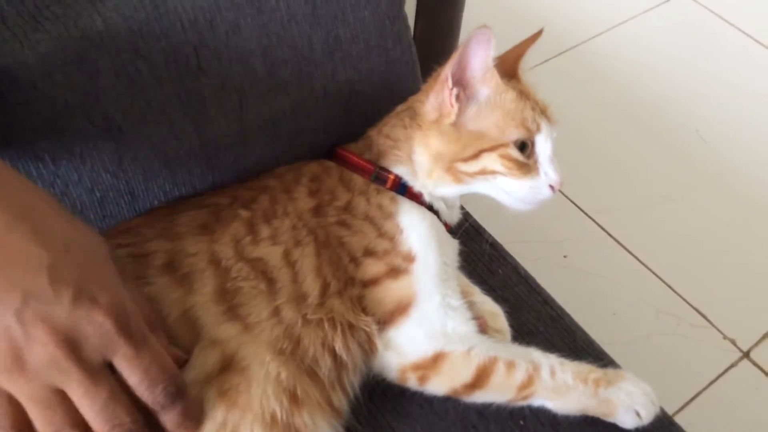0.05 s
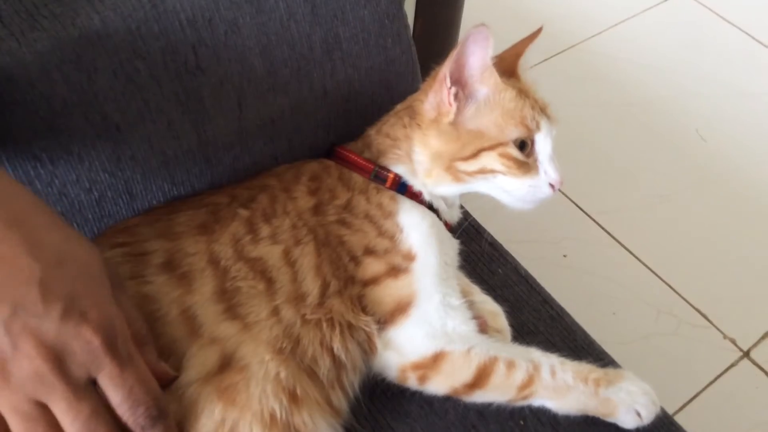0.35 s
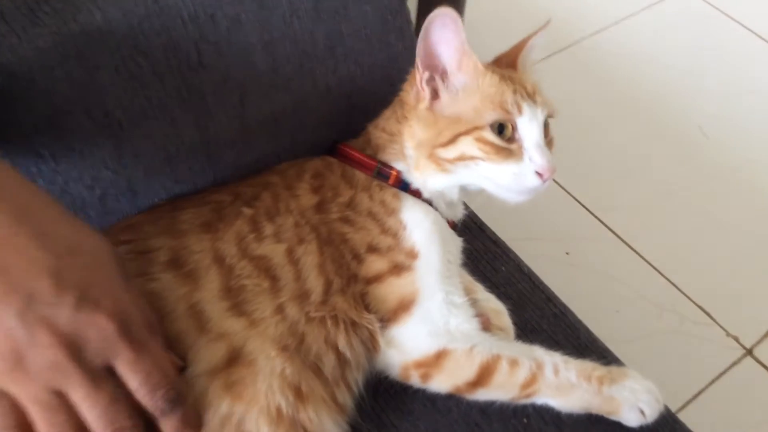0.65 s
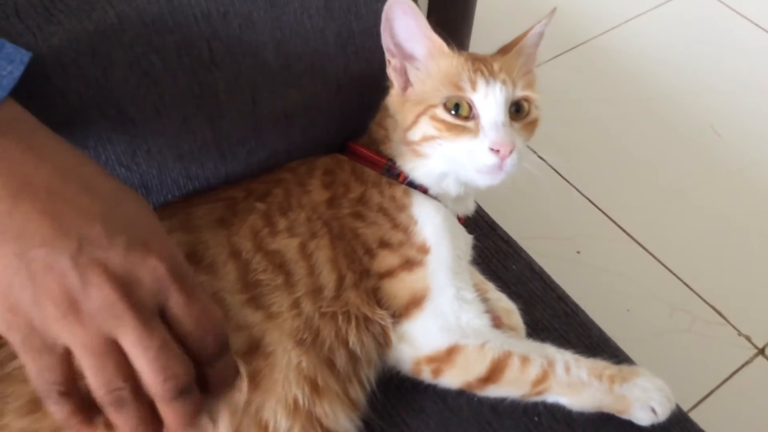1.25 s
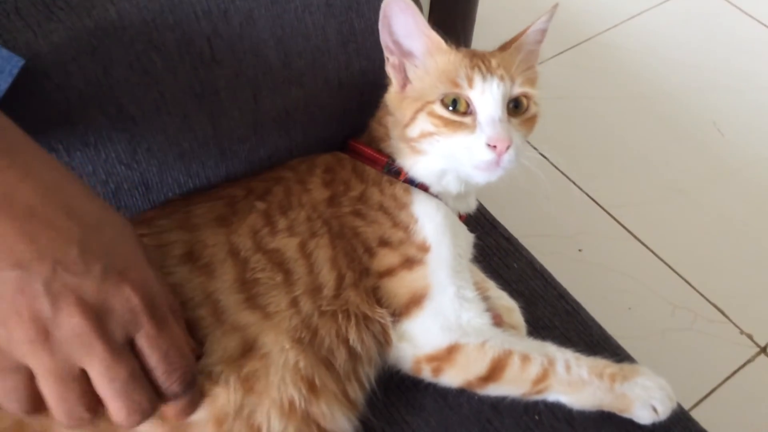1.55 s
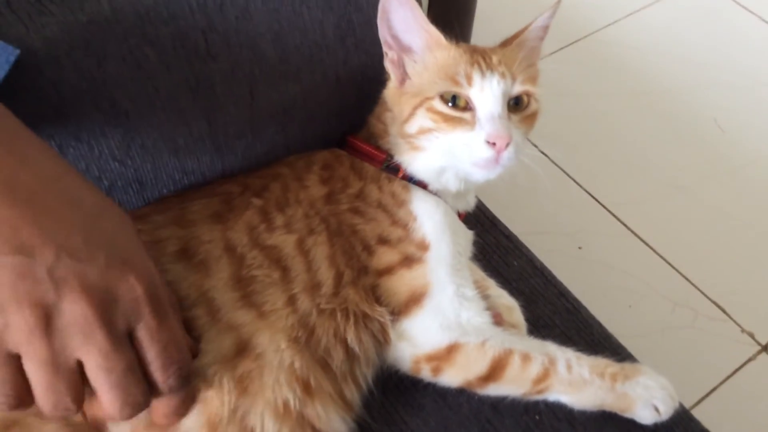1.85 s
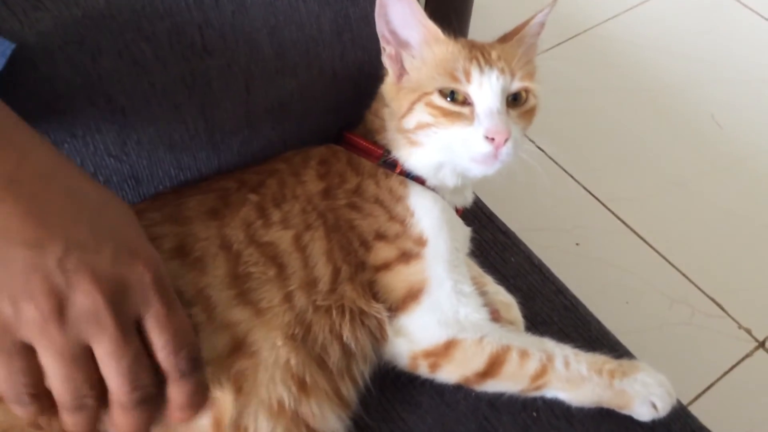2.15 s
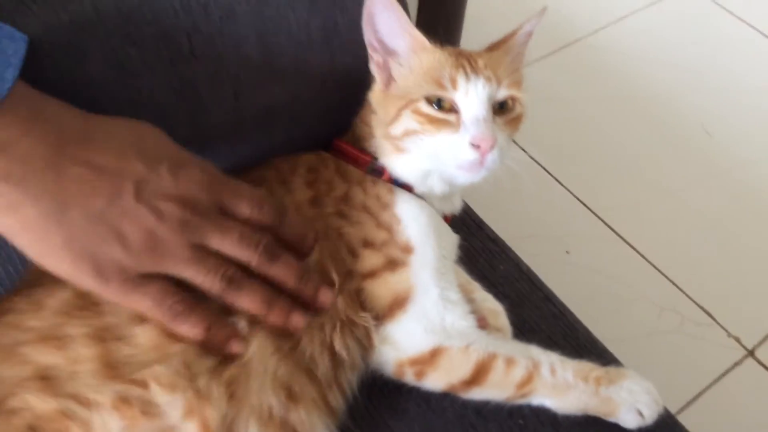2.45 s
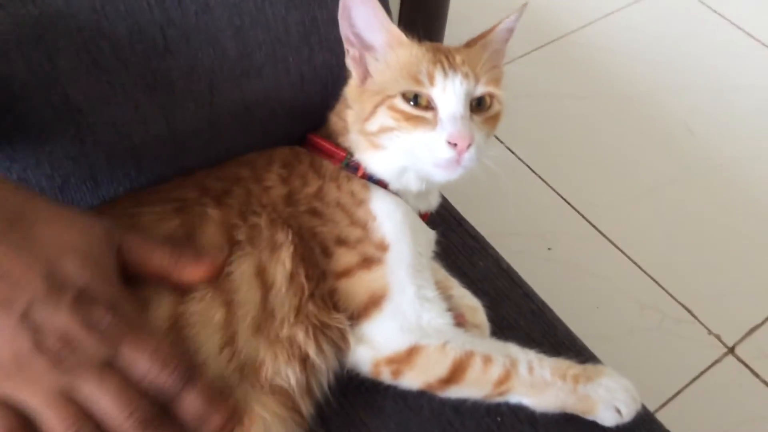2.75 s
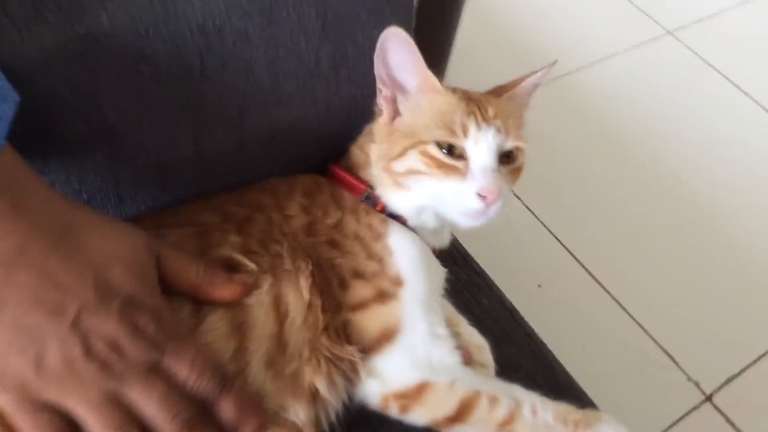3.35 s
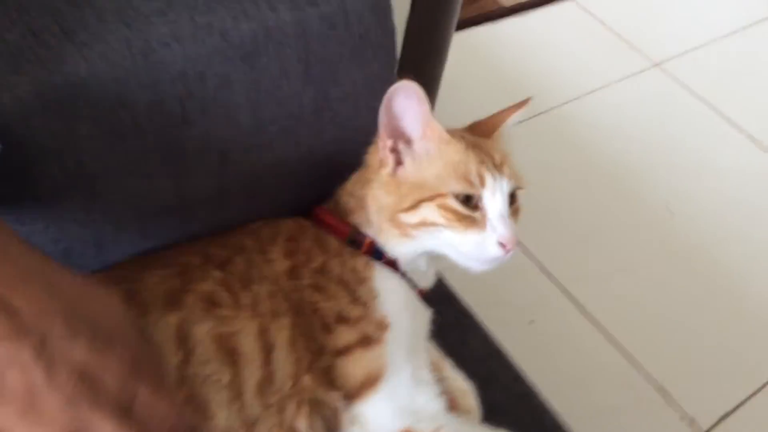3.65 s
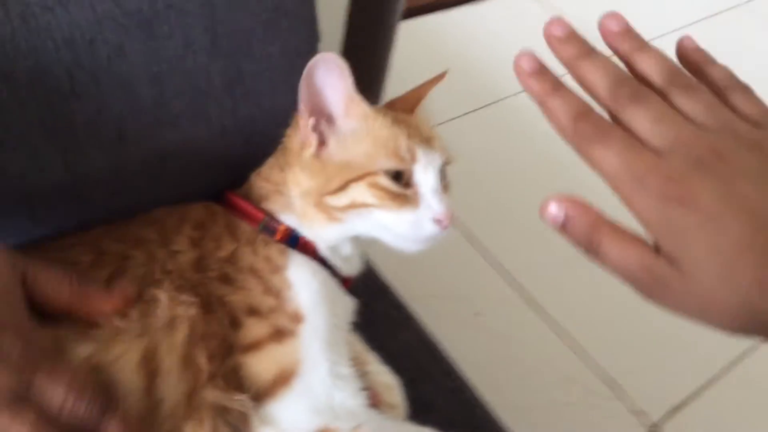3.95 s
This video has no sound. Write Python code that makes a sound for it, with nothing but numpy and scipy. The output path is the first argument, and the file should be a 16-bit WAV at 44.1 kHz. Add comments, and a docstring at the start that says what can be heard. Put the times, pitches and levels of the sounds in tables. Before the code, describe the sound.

A hand pets a cat, close up in a quiet room. Fingertips first scratch faintly to and fro in the fur, then louder strokes and pats bring swishes, dull thumps and small ticks. A faint purr runs underneath.

```python
"""Petting a purring cat.

A hand scratches a softly purring cat, close up in a quiet room. The fingertips first hiss to and fro
in the fur; then the whole hand pats and strokes the flank: dull thumps of the body, swishes of
slipping hairs and sharp ticks. Underneath, pulses of the larynx ring the cat's throat and chest."""
import sys
import numpy as np
from scipy import signal
from scipy.fft import rfft, irfft
from scipy.io import wavfile

SR = 44100
rng = np.random.default_rng(int(sys.argv[2]) if len(sys.argv) > 2 else 0)


def persist_wave(psi):
    """Save psi, clipped to +-1, as 16-bit WAV."""
    counts = np.round(np.clip(psi, -1, 1) * 32767).astype(np.int16)
    wavfile.write(sys.argv[1], SR, np.atleast_2d(counts).T)


N = 4 * SR
T = np.arange(N) / SR
TOP_HZ = 16000


def amp(db):
    """Decibels to gain."""
    return 10 ** (np.asarray(db) / 20)


def unit(x):
    """Scale to rms 1."""
    return x / np.sqrt(np.mean(x ** 2))


def curve(table, column=1):
    """One column of a table, joined by straight lines in time."""
    rows = np.array(table)
    return np.interp(T, rows[:, 0], rows[:, column])


def swell(middle_s, length_s, db):
    """A bell-shaped gain, length_s wide at half power."""
    return amp(db) * 0.5 ** (2 * ((T - middle_s) / length_s) ** 2)


def colour(x, spectrum):
    """Filter x by a curve of (Hz, dB) points and scale to rms 1."""
    hz, db = np.array(spectrum).T
    bins_hz = np.maximum(np.arange(N // 2 + 1) * SR / N, 1)
    gain = amp(np.interp(np.log(bins_hz), np.log(hz), db))
    return unit(irfft(rfft(x) * gain, N))


def ring(x, hz, q):
    """A damped resonance, gain 1 at its centre."""
    w = 2 * np.pi * hz / SR
    a = np.sin(w) / (2 * q)
    return signal.lfilter([a, 0, -a], [1 + a, -2 * np.cos(w), 1 - a], x)


def lowpass(x, hz, order=1):
    """Butterworth low-pass."""
    return signal.sosfilt(signal.butter(order, hz, fs=SR, output="sos"), x)


def add(out, start_s, x, peak_db):
    """Mix x into out at the given time and peak level."""
    i = int(start_s * SR)
    out[i:i + len(x)] += (x * amp(peak_db) / np.abs(x).max())[:N - i]


def friction(spectrum, slips_per_s=3200, spread_db=6, slip_share=0.52):
    """Countless hairs slip one by one, over a smooth hiss."""
    slips = (rng.random(N) < slips_per_s / SR) * rng.choice([-1, 1], N)
    size = amp(spread_db * np.minimum(rng.exponential(size=N), 3.7))
    grain = np.sqrt(slip_share) * unit(slips * size)
    hiss = np.sqrt(1 - slip_share) * rng.standard_normal(N)
    return colour(grain + hiss, spectrum)


# Fingertip passes. Each row: middle in seconds, length in seconds, level in dB.
FINGER_PASSES = [(0.064, 0.055, -78.5), (.235, 0.047, -73), (0.376, 0.085, -76.5), (0.53, 0.11, -77.5),
                 (.70, 0.063, -74.5), (0.874, 0.065, -74), (1.06, 0.082, -79.5), (1.222, 0.062, -71.5),
                 (1.562, 0.081, -68.5), (1.772, 0.064, -76.5), (1.95, 0.085, -70), (2.135, 0.047, -76.5),
                 (2.303, 0.093, -69.5), (2.50, .12, -75), (2.67, 0.091, -72), (3.385, 0.061, -67)]
# Their hiss. Each row: frequency in Hz, relative level in dB.
FINGER_SPECTRUM = [(800, 2.5), (1450, -12), (2100, -18), (2850, -6), (3600, -13), (5500, -2.5), (7300, 5.5),
                   (10000, 5.5), (12500, 0), (14500, -8), (16000, -21)]


def scratching():
    """Each pass of the fingertips through the fur is a smooth swell of high hiss."""
    power = sum(swell(*row) ** 2 for row in FINGER_PASSES)
    return np.sqrt(power) * colour(rng.standard_normal(N), FINGER_SPECTRUM)


# Hand strokes. Each row: peak time, rise and fall in seconds, then skin, coat and hair levels in dB.
HAND_STROKES = [(.58, 0.18, 0.34, -77, -76.5, -76.5), (2.384, 0.0065, .035, -39.5, -50, -38.5),
                (2.424, 0.072, 0.075, -58, -53.5, -51), (2.60, 0.17, 0.11, -75, -76.5, -65),
                (2.62, 0.015, 0.024, -62, -64, -65.5), (2.728, 0.016, .015, -56, -57, -53),
                (2.772, 0.041, .025, -44, -47.5, -45), (2.804, 0.026, 0.072, -58.5, -79, -58.5),
                (2.865, 0.066, 0.037, -52.5, -60, -55), (2.936, 0.04, 0.049, -53.5, -55, -55),
                (2.953, 0.0054, 0.015, -38.5, -46, -60), (3.02, 0.053, .04, -62, -67, -68),
                (3.058, 0.0046, 0.014, -50, -59, -50), (3.086, 0.033, 0.039, -29, -32.5, -36),
                (3.105, 0.015, 0.019, -47, -29, -42.5), (3.197, 0.095, 0.062, -43.5, -44, -52.5),
                (3.214, 0.0074, 0.019, -16, -25.5, -32), (3.238, 0.06, 0.039, -30.5, -41.5, -44.5),
                (3.322, 0.13, 0.069, -47.5, -48, -59.5), (3.54, .12, 0.043, -55.5, -60, -68),
                (3.612, 0.048, 0.028, -41, -40.5, -51), (3.658, 0.015, 0.058, -55, -54, -66),
                (3.741, 0.059, 0.025, -51, -54, -64.5), (3.82, 0.022, 0.029, -56.5, -54.5, -69),
                (3.91, 0.047, 0.064, -55.5, -53, -63), (3.947, 0.018, 0.01, -47, -42.5, -53.5),
                (3.978, 0.09, 0.043, -56.5, -54, -62.5)]
# Skin rustle, coat rub and hair hiss. Each row: frequency in Hz, relative level in dB.
SKIN_SPECTRUM = [(40, -5), (90, 10.5), (200, -3.5), (330, -5), (520, 0), (850, -8), (1200, -4.5),
                 (1600, -7), (4000, -62)]
COAT_SPECTRUM = [(200, -0.5), (600, 3), (1000, 2), (1700, 5), (2300, 2), (3000, 0), (4000, -43),
                 (7000, -49), (11500, -23), (15000, -50)]
HAIR_SPECTRUM = [(800, -30), (2000, -4.5), (3200, 3.5), (5000, 2.5), (7000, -2.5), (9000, -8),
                 (11500, -13.5), (14000, -18), (16000, -30)]


def stroking(roundness=1.32):
    """Each stroke swells and fades; pressing sounds the skin and coat, skimming sounds the hair tips."""
    powers = np.zeros((3, N))
    for peak_s, rise_s, fall_s, *levels_db in HAND_STROKES:
        distance = np.maximum((peak_s - T) / rise_s, (T - peak_s) / fall_s)
        envelope = amp(-20 * np.minimum(distance, 10) ** roundness)  # rise and fall span 20 dB
        powers += (amp(levels_db)[:, None] * envelope) ** 2
    spectra = (SKIN_SPECTRUM, COAT_SPECTRUM, HAIR_SPECTRUM)
    return sum(np.sqrt(power) * friction(spectrum) for power, spectrum in zip(powers, spectra))


# Pats on the body. Each row: start in seconds, peak in dB, resonance in Hz, contact in seconds, Q.
FLANK_PATS = [(1.137, -51, 153, 0.0021, 3.2), (1.711, -55, 127, 0.002, 1.5),
              (2.29, -46, 127.5, 0.0027, 1.4), (2.3833, -17, 66.7, 0.0008, 0.45),
              (2.613, -45, 100, 0.0031, 1.1), (2.7781, -22, 204, 0.00074, 0.51),
              (2.9203, -19, 430, 0.00082, 0.92), (2.92, -29.5, 80.1, 0.0024, 1.2),
              (2.935, -35, 73.2, .004, 1.8), (2.953, -22.5, 98, 0.0039, 0.44),
              (2.967, -31, 77.4, 0.0033, 1.2), (3.053, -21.5, 163, 0.0033, 1.2),
              (3.069, -27, 101, .003, 0.88), (3.085, -20, 65, 0.0041, 0.84),
              (3.113, -34.5, 90, 0.0038, 1.5), (3.2105, -9, 900, 0.00052, 4.4),
              (3.2111, -4.5, 146, 0.0041, 3.34), (3.213, -21, 72, 0.0048, 3.6),
              (3.238, -17.5, 171, 0.0025, 3.8), (3.256, -27, 360, 0.0012, 4.3),
              (3.745, -47, 99, 0.0048, 0.76), (3.937, -24, 130, 0.004, 3.1),
              (3.9424, -28, 300, 0.0011, 1.8), (3.9456, -20.5, 88, 0.0037, 1.3)]


def patting():
    """A soft half-sine push sets the flank swinging briefly."""
    out, t = np.zeros(N), T[:SR // 10]
    for start_s, peak_db, hz, contact_s, q in FLANK_PATS:
        push = np.sin(np.pi * np.minimum(t / contact_s, 1))
        add(out, start_s, ring(push, hz, q), peak_db)
    return out


# Ticks of the hand. Each row: start in seconds, peak in dB, centre in Hz, Q, cutoff in Hz.
HAND_TICKS = [(.7574, -43, 952, 1.13, 2180), (1.117, -54.5, 1100, 1.7, 1808),
              (1.273, -49.5, 7900, 0.94, 15000), (1.6385, -37, 3500, 0.19, 14950),
              (2.3422, -34.5, 3500, 0.13, 15000), (2.3565, -43, 1100, 0.47, 2500),
              (2.372, -32, 5440, 0.14, 13940), (2.3836, -14, 3100, 1.1, 7000),
              (2.4705, -37.5, 7500, 0.37, 14000), (2.4759, -43.5, 800, .7, 2000),
              (2.7455, -27, 1806, 0.36, 7000), (2.9203, -15, 1400, 0.54, 8500),
              (3.0782, -15.5, 2800, 1.5, 6900), (3.0805, -19.5, 4000, 0.58, 9940),
              (3.128, -25.5, 2940, 1.2, 5960), (3.166, -27, 1980, 1.8, 4450),
              (3.182, -33.5, 3500, 0.35, 9000), (3.2098, -11, 3100, 5.2, 5870),
              (3.2762, -16.5, 1520, 0.53, 4400), (3.3081, -16, 1790, 0.44, 2800),
              (3.5135, -44.5, 3000, 1.06, 4000), (3.536, -40.5, 1997, 1.8, 4960),
              (3.5838, -37, 2200, .6, 5010), (3.6084, -19, 1400, 1.4, 6160),
              (3.6133, -8.5, 1540, 1.8, 3570), (3.6945, -37, 2300, 1.6, 4500),
              (3.6992, -30.5, 890, 0.51, 2000), (3.7028, -18, 2180, 1, 3760),
              (3.7183, -25.5, 2324, 2, 5000), (3.7194, -28.5, 3506, 0.6, 9300),
              (3.8104, -43.5, 3015, 0.17, 10000), (3.8455, -49, 9960, .7, 14000),
              (3.8815, -48, 8000, .5, 14000), (3.9025, -47, 9020, .6, 14000), (3.9605, -32, 3330, 2, 6040)]


def ticking():
    """Tiny snaps, about a millisecond long, as the hand catches and lets go."""
    out, snap = np.zeros(N), signal.unit_impulse(SR // 20)
    for start_s, peak_db, hz, q, cutoff_hz in HAND_TICKS:
        add(out, start_s, lowpass(ring(snap, hz, q), cutoff_hz, order=2), peak_db)
    return out


# Course of the purr. Each row: time in seconds, flutter rate in Hz, level in dB.
PURR_COURSE = [(0, 27.5, -67.5), (.2, 27.6, -76), (.3, 29, -90), (.43, 24.8, -68.5), (.65, 25.1, -71),
               (.82, 24, -70.5), (1.15, 26.6, -72), (1.3, 25.9, -76), (1.53, 29.6, -70.5), (1.8, 25.7, -71),
               (2.03, 24.3, -70.5), (2.15, 26.6, -75.5), (2.5, 22, -67), (4, 26.3, -65)]
# Throat and chest resonances. Each row: frequency in Hz, Q, relative gain in dB.
THROAT_MODES = [(104.6, 2.4, 1), (266, 3.2, -6), (560, 13.6, -7.5)]
# Thin hiss in the purr. Each row: frequency in Hz, relative level in dB.
PURR_HISS_SPECTRUM = [(2000, -10.5), (5500, -12), (7200, -1), (8200, -4), (9800, -1), (11500, -15),
                      (15000, -22)]


def purring(jitter=0.0066, shut_cycles=0.35, shut_db=-2, hiss_decay_cycles=0.2):
    """The larynx opens and shuts about 26 times a second, ringing throat and chest; a brief hiss joins."""
    wander = unit(lowpass(rng.standard_normal(N), hz=14))
    cycles = np.cumsum(curve(PURR_COURSE) * (1 + jitter * wander)) / SR
    opens, shuts = (np.diff(np.floor(c), prepend=np.floor(c[0])) for c in (cycles, cycles - shut_cycles))
    unevenness_db = 0.82 * rng.standard_normal(N)
    pulses = (opens + amp(shut_db) * shuts) * amp(unevenness_db)
    throat = sum(amp(db) * ring(pulses, hz, q) for hz, q, db in THROAT_MODES)
    voice = unit(lowpass(throat, hz=833, order=4)) * amp(curve(PURR_COURSE, column=2))
    flutter = np.exp(-(cycles % 1) / hiss_decay_cycles)
    hiss = unit(flutter * colour(rng.standard_normal(N), PURR_HISS_SPECTRUM))
    return voice + swell(middle_s=1.453, length_s=0.21, db=-74) * hiss


# Arm rumble. Each row: time in seconds, level in dB.
ARM_LEVELS = [(0, -82), (1.4, -72), (1.55, -67), (2.05, -68.5), (2.15, -77), (2.4, -73.5), (2.9, -64),
              (3.0, -51), (3.12, -48), (3.3, -57), (3.55, -54.5), (3.74, -60), (3.84, -67.5), (4, -48)]
# Arm rumble and room air. Each row: frequency in Hz, relative level in dB.
ARM_SPECTRUM = [(20, -50), (45, -10.5), (95, 0), (170, -5), (300, -11), (700, -42.5), (2000, -53)]
ROOM_SPECTRUM = [(20, -30), (35, -4.5), (50, 0), (70, -3.5), (110, -4.5), (250, -10), (500, -15.5),
                 (900, -26), (1450, -24), (2500, -29), (5000, -28), (8000, -27.5), (13000, -31.5),
                 (16000, -45.5)]


def background(room_db=-68.5):
    """Quiet room air and the low rumble of the moving arm."""
    room = amp(room_db) * colour(rng.standard_normal(N), ROOM_SPECTRUM)
    arm = amp(curve(ARM_LEVELS)) * colour(rng.standard_normal(N), ARM_SPECTRUM)
    return room + arm


def scene():
    """Everything is close and dry, in one channel."""
    return (scratching() + stroking() + patting() + ticking() + purring() + background())[None]


def record(dry):
    """The microphone drops the deepest bass and cuts the top."""
    bass_cut = signal.butter(4, 33, "high", fs=SR, output="sos")
    top_cut = signal.ellip(8, 0.2, 70, TOP_HZ, fs=SR, output="sos")
    return signal.sosfilt(top_cut, signal.sosfilt(bass_cut, dry))


dry = scene()
out = record(dry)
persist_wave(out)
```